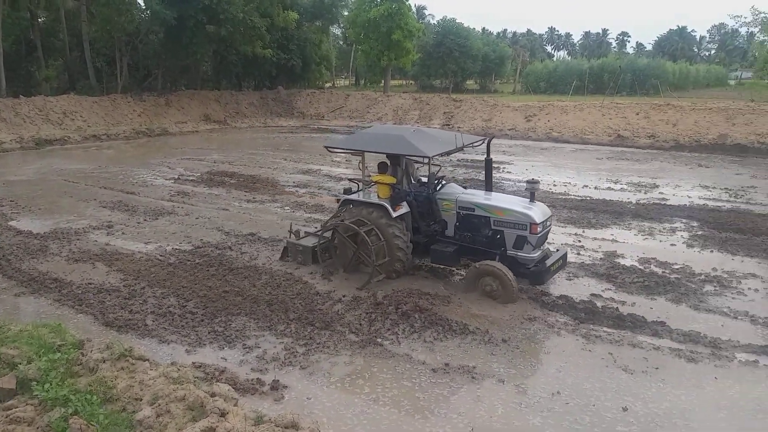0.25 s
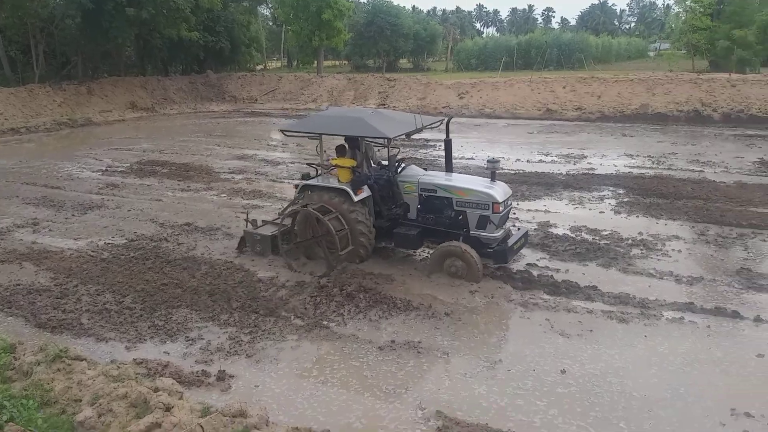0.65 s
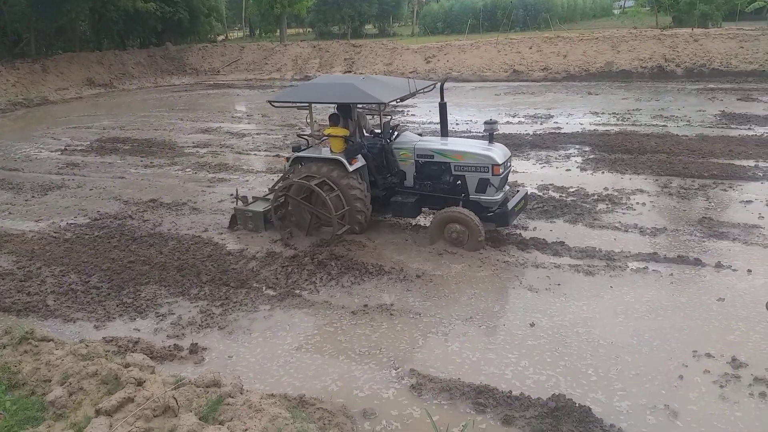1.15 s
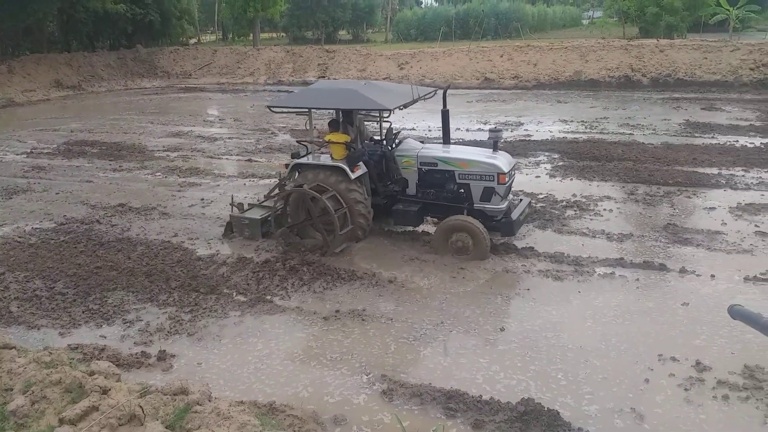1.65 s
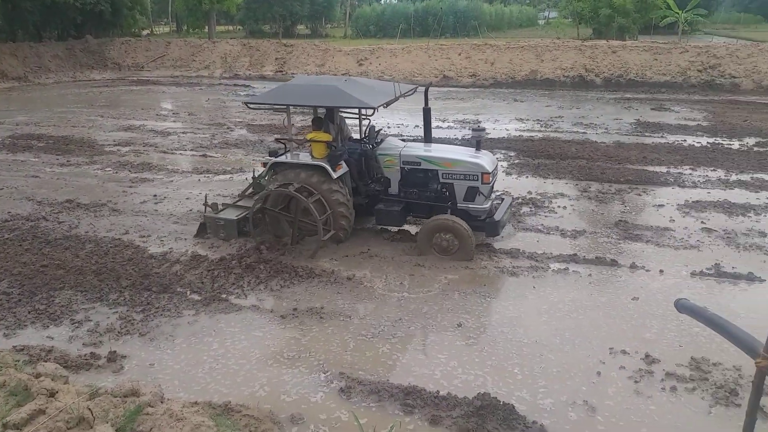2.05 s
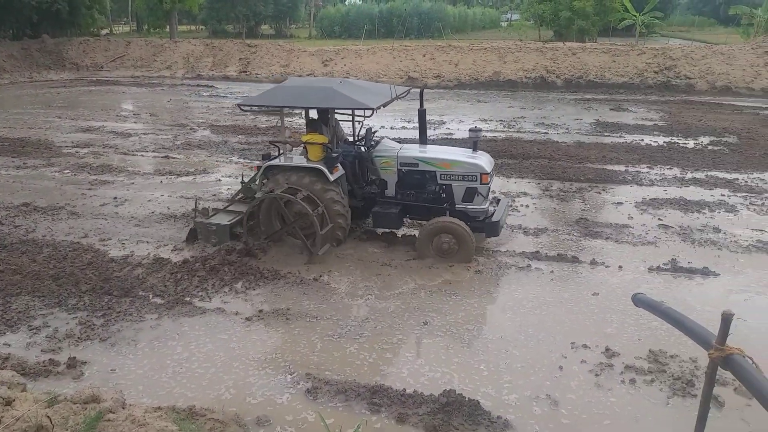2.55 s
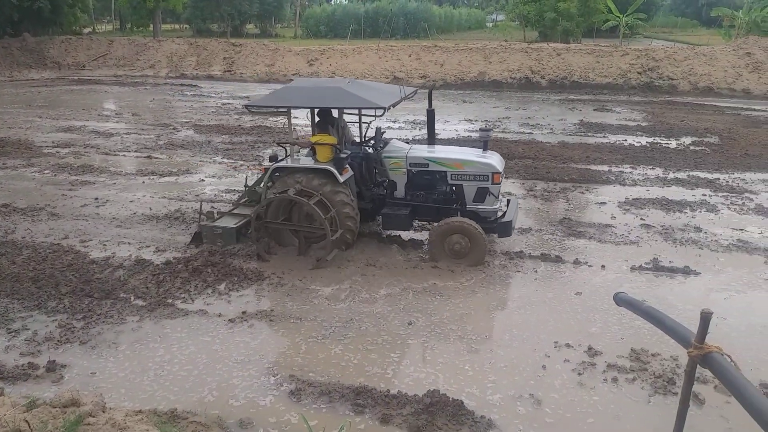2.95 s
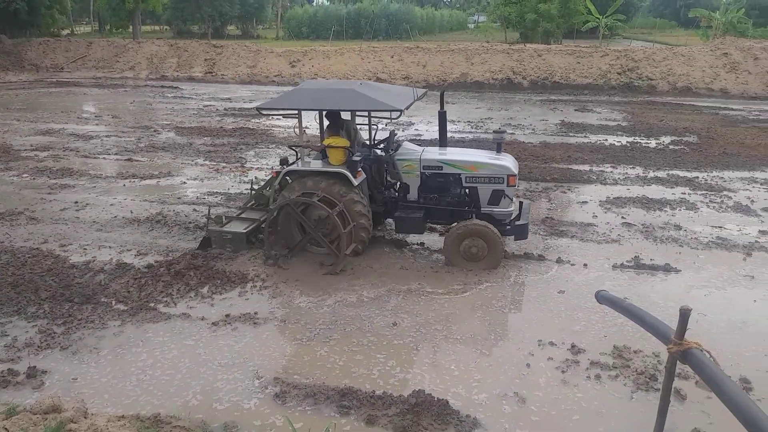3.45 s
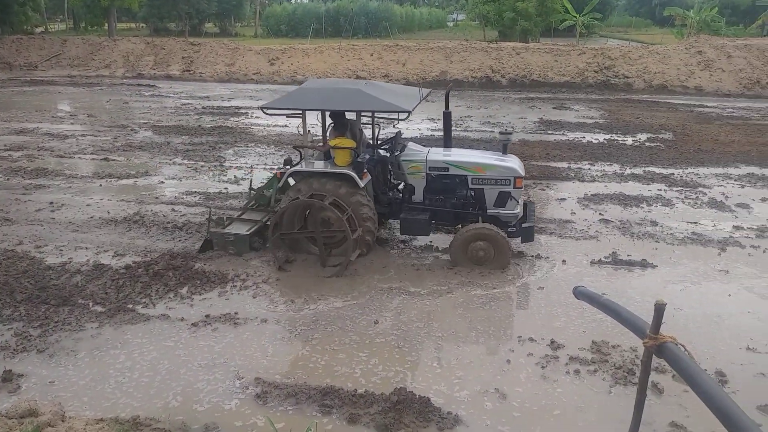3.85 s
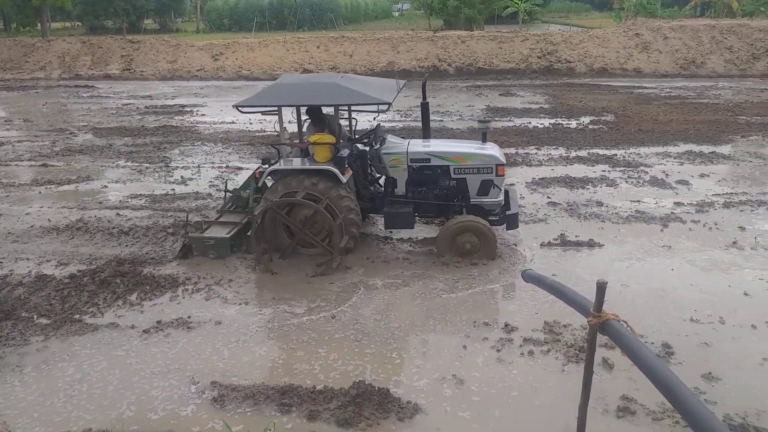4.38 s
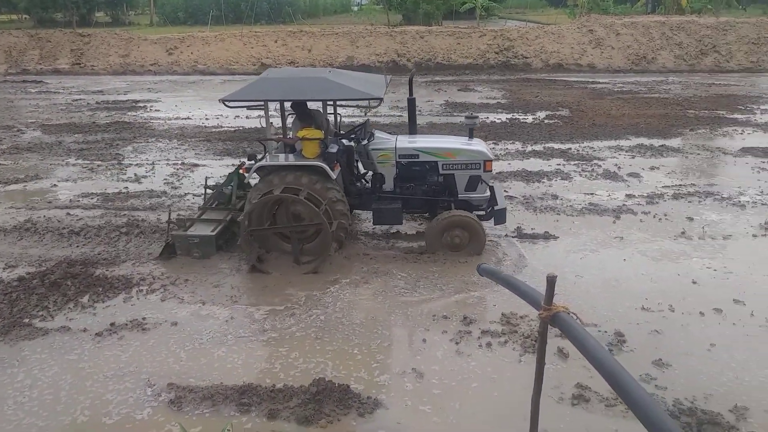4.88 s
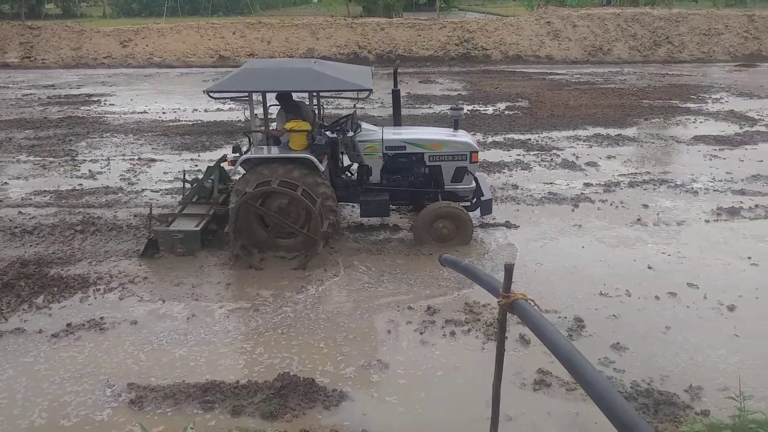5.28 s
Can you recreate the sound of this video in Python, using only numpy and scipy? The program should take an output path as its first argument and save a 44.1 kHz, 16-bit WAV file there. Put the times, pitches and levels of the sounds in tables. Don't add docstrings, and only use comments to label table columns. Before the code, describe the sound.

A diesel tractor works steadily through a flooded field some metres away. Fast, even firing makes a dense midrange metallic clatter with irregular harder knocks, over a rough low exhaust roar and continuous muddy wash with airy hiss. Two tiny falling bird chirps and thin gear whine show near the start. Open air, dry, close stereo pickup, loud and slightly squashed, with no start or stop.

```python
import sys
import numpy as np
from scipy import signal
from scipy.fft import rfft, irfft
from scipy.io import wavfile
from scipy.ndimage import uniform_filter1d, minimum_filter1d, map_coordinates

SR = 44100
rng = np.random.default_rng(int(sys.argv[2]) if len(sys.argv) > 2 else 0)


def nominal_scale(level):
    x = np.asarray(level, float) / 20
    return 10 ** x


def pcm_store(signal):
    levels = np.round(np.clip(np.atleast_2d(signal), -1, 1) * 32767)
    wavfile.write(sys.argv[1], SR, levels.astype(np.int16).T)


N = 243458
T_S = np.arange(N) / SR


def curve(rows):
    s, value = np.transpose(rows)
    return np.interp(T_S, s, value)


def evened(x):
    return x / np.sqrt(np.mean(x ** 2) + 1e-20)


def add(mix, s, sound):
    part = mix[round(s * SR):][:len(sound)]
    part += sound[:len(part)]


def drift(hz):
    knots = rng.standard_normal(400)
    steps = np.arange(0, N + 64, 64)
    return np.interp(np.arange(N), steps, map_coordinates(knots, [steps / SR * hz], order=3))


def bursts(turns, share, rise, decay, uneven_db, cylinder_db):
    firing, place = np.floor(turns).astype(int) + 1, turns % 1
    strength_db = uneven_db * np.clip(rng.standard_normal(300), -2, 1.3) + np.resize(cylinder_db, 300)
    shape = (1 - np.exp(-(place / rise) ** 2)) * np.exp(-place / decay)
    shape = shape * nominal_scale(strength_db[firing])
    share = np.clip(share, 0, 1)
    return np.sqrt(1 - share + share * evened(shape) ** 2)


def repeating(turns, share):
    per_firing = rng.standard_normal((20, 1, 1100))
    per_cylinder = np.sqrt(.25) * rng.standard_normal((20, 3, 1100))
    habit = (per_firing + per_cylinder).reshape(20, -1)
    renew_s = .8
    age, place = T_S / renew_s, (turns % 3 * 1100).astype(int) % 3300
    old, fade = age.astype(int), np.pi / 2 * (age % 1)
    same = np.cos(fade) * habit[old, place] + np.sin(fade) * habit[old + 1, place]
    return np.sqrt(share) * evened(same) + np.sqrt(1 - share) * rng.standard_normal(N)


def patchwork(shape, bins, frames):
    chance = rng.standard_normal(shape[::-1]).T
    return evened(uniform_filter1d(uniform_filter1d(chance, size=bins, axis=0), size=frames, axis=1))


def coloured(loudness, noise, spectrum, patchy_db, lift_db, lift_hz):
    hz, t, z = signal.stft(loudness * noise, SR, nperseg=1024, noverlap=768)
    patches = patchwork(z.shape, 7, 20)
    f, db = np.transpose(spectrum)
    colour_db = np.interp(np.log(hz + 1), np.log(f), db, left=-90, right=-90)[:, None]
    band = uniform_filter1d(1. * (hz > lift_hz[0]) * (hz < lift_hz[1]), size=5)[:, None]
    frame_lift_db = (lift_db * np.ones(N))[np.minimum(t * SR, N - 1).astype(int)]
    z = z * nominal_scale(colour_db + patchy_db * patches + band * frame_lift_db)
    return evened(signal.istft(z, nperseg=1024, noverlap=768)[1][:N])


def panels(x, depth_db):
    _, _, z = signal.stft(x, SR, nperseg=4096, noverlap=3072)
    stripes = patchwork(z.shape, 3, 14)
    return evened(signal.istft(z * nominal_scale(depth_db * stripes), nperseg=4096, noverlap=3072)[1][:N])


def head_on():
    turn_s = 0.89
    return np.exp(-T_S / turn_s)


# (time [s], firing rate [Hz])
FIRING = [(0, 40.75), (.36, 40.05), (.71, 40.4), (1.15, 39.04), (1.72, 39.99), (2.32, 39.24), (2.59, 39.48),
          (2.97, 38.64), (3.42, 38.78), (3.84, 40.09), (4.27, 39.07), (4.67, 39.04), (5.04, 39.58),
          (5.52, 39.73)]


def crank():
    speed_hz = curve(FIRING)
    turns = -.04 + np.cumsum(speed_hz) / SR
    block_turns = turns + .09 + .017 * T_S
    free_speed_hz = 40.15
    return turns, block_turns, np.maximum(free_speed_hz - speed_hz, 0)


# (time [s], level [dB])
LEVEL = [(0, -16.5), (.5, -15), (.9, -15.5), (1.25, -15), (1.6, -15), (2, -16.5), (2.3, -16), (2.7, -15),
         (3, -15), (3.6, -15.5), (3.85, -17), (4.15, -16.5), (4.45, -15.5), (4.8, -15.5), (5.05, -17),
         (5.52, -17)]


def distance_swing_db():
    level_db = curve(LEVEL)
    return level_db - level_db.mean()


# (multiple of firing rate [-], level at start [dB], midway [dB], at end [dB])
ORDER_TONES = [(1, -61, -57.5, -60), (2, -41.5, -40, -39), (3, -54, -62, -62), (4, -51, -47, -39),
               (5, -52, -42, -45), (6, -55, -56, -53), (7, -55, -48, -51), (8, -45, -52, -47),
               (9, -56, -63, -48), (10, -48, -50, -52), (13.67, -41, -52, -50), (14, -45, -43, -55),
               (16.67, -40, -43, -52), (19, -48, -38, -46), (20, -50, -40, -48)]


def exhaust(turns):
    out = np.zeros(N)
    for k, *levels_db in ORDER_TONES:
        waver_db, wander = .15 * k * drift(3), .012 * k * drift(5)
        level_db = np.interp(np.arange(N), [0, N / 2, N], levels_db) + waver_db
        phase = 2 * np.pi * round(3 * k) / 3 * turns + wander
        out -= np.sqrt(2) * nominal_scale(level_db) * np.cos(phase)
    return out


# (frequency [Hz], density [dB per Hz])
RATTLE = [(650, -25), (1100, -24.5), (1290, -6.5), (1660, -9.5), (1810, -4.5), (2050, -2), (2180, -5.5),
          (2600, -15.5), (2920, -21), (3500, -13.5), (3670, -13), (4300, -32), (5590, -31.5), (9460, -120)]


def rattle(block_turns, share, load, swing_db):
    clatter = bursts(block_turns, .7 * share, .2, .28, 1.6, [1.2, -1.5, .8])
    lower_db = -2 + 6 * head_on()
    noise = coloured(clatter, repeating(block_turns, .2), RATTLE, 0.12, lower_db, (1100, 1600))
    return nominal_scale(-16.5 + swing_db + 0.5 * load) * panels(noise, 1.6)


# (time [s], peak [dB], ring [Hz])
KNOCKS = [(.2753, 1.5, 1850), (.3995, 7, 1890), (1.074, 8, 1950), (1.1518, 8, 2040), (1.2785, 3, 1880),
          (1.3778, 7, 1880), (1.6806, 7, 1813), (1.7335, 6, 2090), (1.7564, 9, 2060), (1.8088, 9.5, 2065),
          (1.8841, 7, 2050), (1.9096, 6, 2060), (1.9565, 2, 2070), (2.2169, 5, 1990), (2.3615, 7, 2120),
          (2.4922, 3, 1935), (2.9796, 5, 2240), (3.1837, 7, 2095), (3.2331, 7, 2090), (3.2844, 8, 2160),
          (3.3643, 9, 2100), (3.49, 6.5, 2130), (3.6426, 7, 2190), (4.4258, 7, 2140), (4.581, 6.5, 2250),
          (4.8863, 7, 2006), (5.0913, 5, 2150), (5.1637, 6, 2100), (5.1921, 3.5, 1930), (5.243, 4, 2120)]


def firing_knocks(block_turns, swing_db):
    count = np.arange(1, int(block_turns[-1]))
    chance = rng.standard_normal((300, 2))[count]
    s = np.interp(count + .2 + .08 * chance[:, 0], block_turns, T_S)
    db = -5 + np.array([5, 4.1, -13])[count % 3] + swing_db[(s * SR).astype(int)]
    soft = np.transpose([s, db, 2050 + 91 * chance[:, 1]])
    free = abs(s[:, None] - np.array(KNOCKS)[:, 0]).min(1) > .012
    return list(KNOCKS) + list(soft[free])


def knocks(rows):
    out, t = np.zeros(N), np.arange(1200) / SR
    envelope = (1 - np.exp(-t / .002)) * np.exp(-t / .0055)
    for (s, db, hz), (a, b) in zip(rows, rng.random((len(rows), 2))):
        lower_hz = hz * (0.75 + 0.296 * b)
        ring = np.sin(2 * np.pi * (hz * t + a)) + 0.39 * np.sin(2 * np.pi * (lower_hz * t + b))
        add(out, s - .001, nominal_scale(db - 7.0) * ring * envelope)
    return out


# (frequency [Hz], density [dB per Hz])
ROAR = [(53, -51), (90, -24), (119, -2.5), (300, -3), (450, -11.5), (540, -0.5), (600, -3.5), (767, 3),
        (853, -2), (1150, -1.5), (1500, -9.5), (2530, -120)]


def roar(block_turns, share, load, swing_db):
    surge = bursts(block_turns + 0.055, .5 * share, 0.38, 0.19, 6.0, [0, -1, .6])
    deep_db = -2.5 + load - 2.5 * head_on()
    noise = coloured(surge, repeating(block_turns, .1), ROAR, 0.23, deep_db, (80, 330))
    return nominal_scale(-26.5 + swing_db + 0.04 * load) * panels(noise, 1.35)


# (frequency [Hz], density [dB per Hz])
PUFF = [(2470, -52), (4200, -27), (5360, -5), (6440, -6), (8210, 10.5), (10500, -10.5), (11800, -14.5),
        (14400, -10), (15800, -14)]


def puffs(block_turns, load):
    loudness = bursts(block_turns, 1.0, 0.31, 0.27, 1.9, [-1.2, .2, 1.2])
    return coloured(loudness, rng.standard_normal(N), PUFF, 1.2, 1.5 + 3 * load, (10000, 16000))


# (frequency [Hz], density [dB per Hz])
HISS = [(2470, -36), (4200, -54), (4340, -13), (5360, -3), (5990, -11.5), (6440, -10), (6800, -10.5),
        (7350, -1), (8210, -1), (10500, -15), (11800, -14.5), (14400, -14), (15800, -11)]


def spray(block_turns, share):
    loudness = bursts(block_turns, 0.38 * share, 0.1, 0.24, 15.0, [0, 0, 0])
    return coloured(loudness, rng.standard_normal(N), HISS, 0.96, -3, (10500, 16000))


def hiss(block_turns, share, load, swing_db):
    leak = np.clip(1.02 * share, 0, 1)
    both = np.sqrt(1 - leak) * nominal_scale(0.9) * spray(block_turns, share)
    both += np.sqrt(leak) * puffs(block_turns, load)
    return nominal_scale(-29 + swing_db + 1.46 * load) * both


# (frequency [Hz], level [dB], fade start [s])
GEARS = [
    (2778, -34, .62),
    (2980, -41, .65),
    (3270, -35, .9),
    (1568, -34, 5),
]


def gears():
    out = np.zeros(N)
    for hz, db, until_s in GEARS:
        level_db = db + 1.5 * drift(6) - 40 * np.maximum(T_S - until_s, 0)
        out += nominal_scale(level_db) * np.cos(2 * np.pi * hz * T_S + .4 * drift(5))
    return out


# (start [s], length [s], top [Hz], bottom [Hz], peak [dB])
CHIRPS = [
    (.104, .036, 4100, 3280, -22),
    (.482, .064, 4480, 3050, -21.5),
]


def bird():
    out = np.zeros(N)
    for start_s, length_s, top_hz, bottom_hz, peak_db in CHIRPS:
        t = np.arange(0, length_s, 1 / SR)
        u = t / length_s
        hz = top_hz + (bottom_hz - top_hz) * np.sin(np.pi / 2 * u ** 1.5) ** 2
        swell_db = peak_db - 21 * abs(u - .76) / .76
        flutter_db = 2.2 * np.cos(2 * np.pi * 95 * (t + start_s))
        ends = np.minimum(1, np.minimum(t, length_s - t) / .003)
        whistle = np.sin(2 * np.pi * np.cumsum(hz) / SR)
        add(out, start_s, np.sqrt(2) * nominal_scale(swell_db + flutter_db) * ends * whistle)
    return out


def scene():
    turns, block_turns, load = crank()
    swing_db = distance_swing_db()
    share = 0.23 + 0.19 * load - 0.01 * swing_db
    mono = exhaust(turns)
    mono += rattle(block_turns, share, load, swing_db)
    mono += knocks(firing_knocks(block_turns, swing_db))
    mono += roar(block_turns, share, load, swing_db)
    mono += hiss(block_turns, share, load, swing_db)
    mono += gears() + bird()
    return np.array([mono, mono])


# (centre [Hz], width [Hz], share to the left [-])
PORTS = [
    (1950, 525, .22),
    (9660, 630, -0.25),
]


def ports(dry):
    side, hz_all = np.zeros(N), np.fft.rfftfreq(N, 1 / SR)
    for hz, width_hz, share in PORTS:
        reach = np.exp(-((hz_all - hz) / (1.6 * width_hz)) ** 4)
        resonance = share * reach / (1 + 2j * (hz_all - hz) / width_hz)
        side += irfft(resonance * rfft(dry[0]), N)
    return dry + np.array([side, -side])


def limited(pair):
    gain = np.minimum(1, .96 / (abs(pair).max(0) + 1e-9))
    return pair * uniform_filter1d(minimum_filter1d(gain, size=181), size=91)


def roll_off(x):
    return signal.sosfilt(signal.butter(12, 16590, fs=SR, output="sos"), x)


def record(dry):
    pair = limited(ports(dry))
    mix = irfft(rfft(pair) * (np.fft.rfftfreq(N, 1 / SR) < 15725), N)
    return roll_off(mix)


dry = scene()
out = record(dry)
pcm_store(out)
```